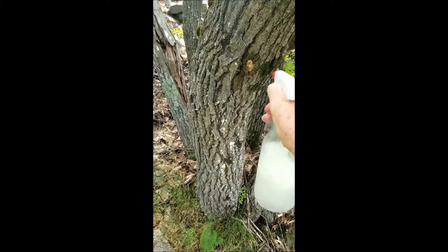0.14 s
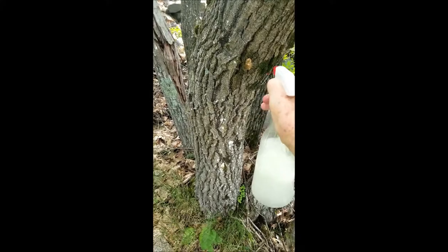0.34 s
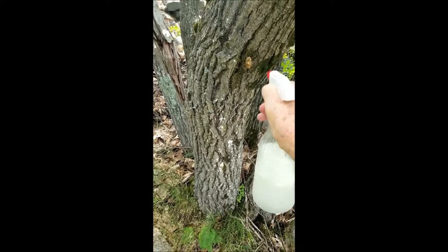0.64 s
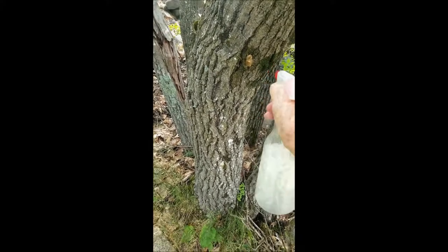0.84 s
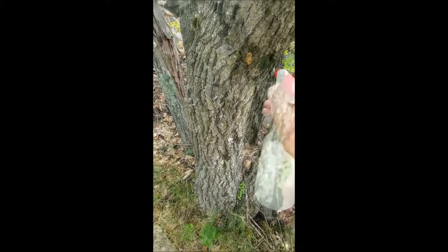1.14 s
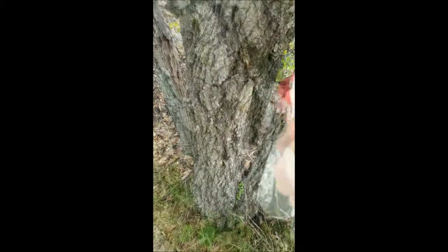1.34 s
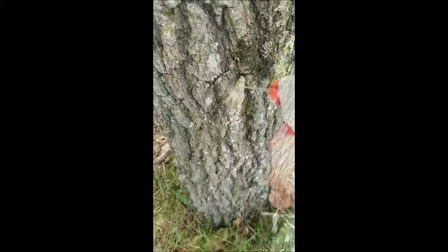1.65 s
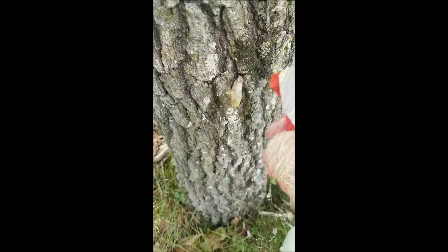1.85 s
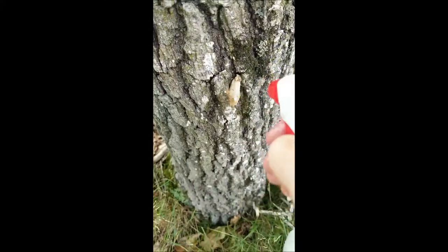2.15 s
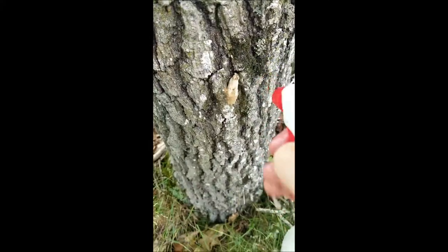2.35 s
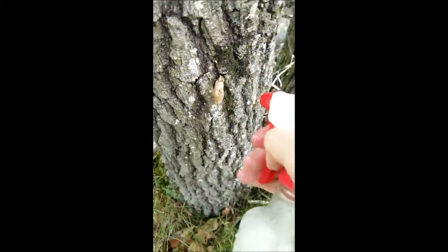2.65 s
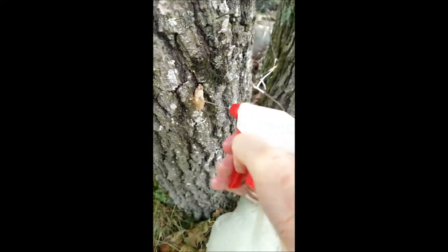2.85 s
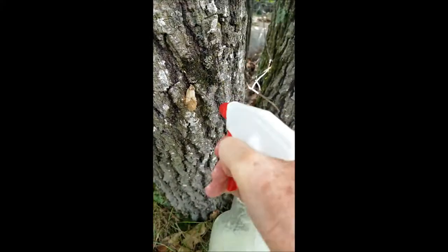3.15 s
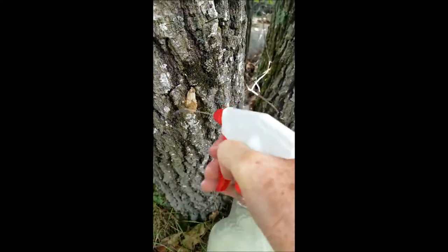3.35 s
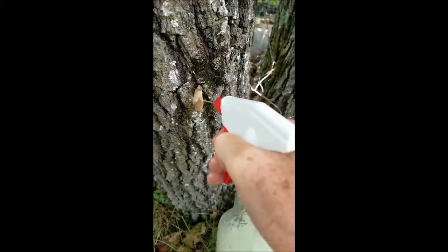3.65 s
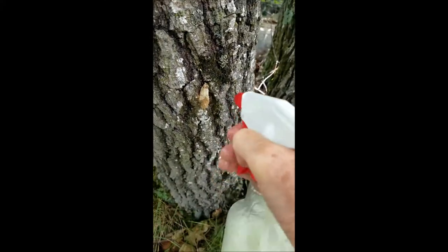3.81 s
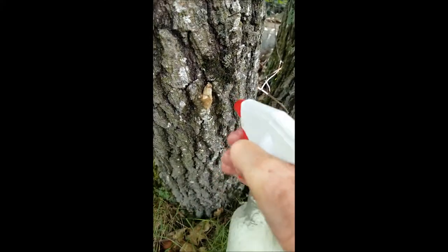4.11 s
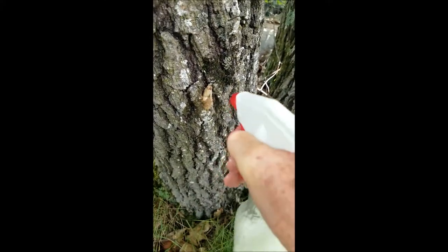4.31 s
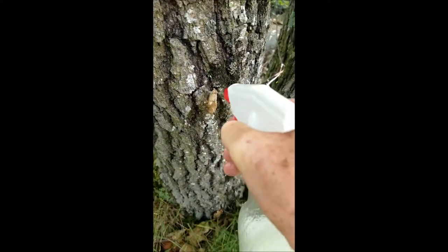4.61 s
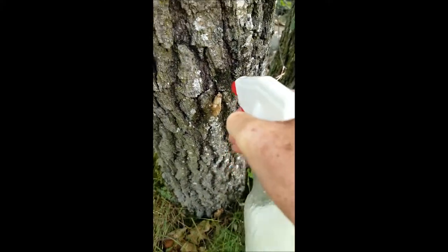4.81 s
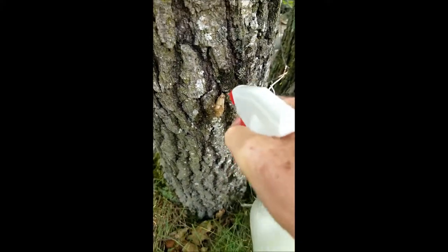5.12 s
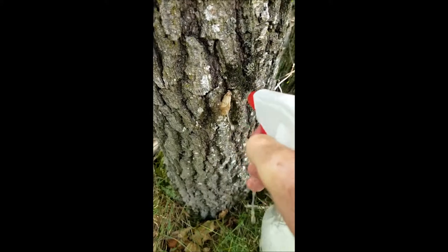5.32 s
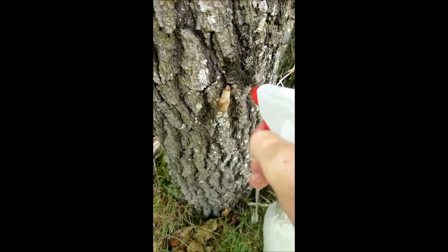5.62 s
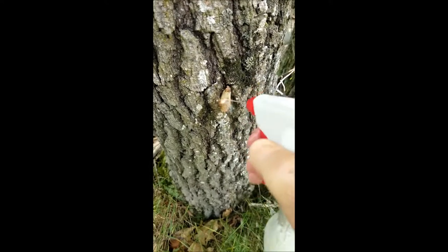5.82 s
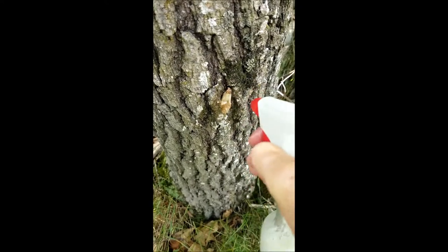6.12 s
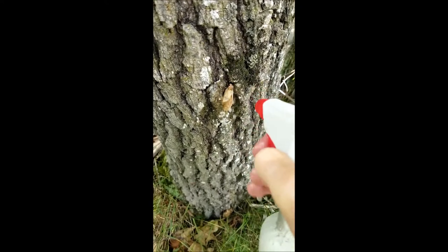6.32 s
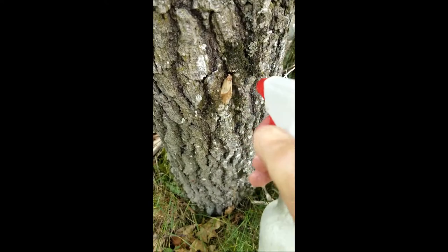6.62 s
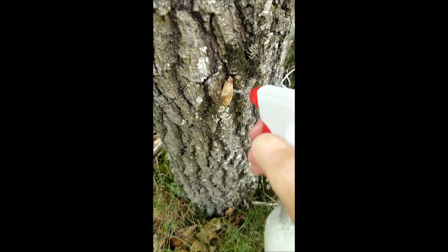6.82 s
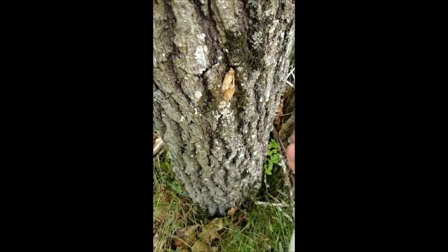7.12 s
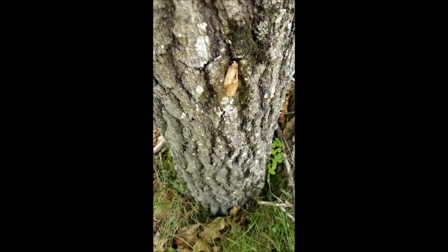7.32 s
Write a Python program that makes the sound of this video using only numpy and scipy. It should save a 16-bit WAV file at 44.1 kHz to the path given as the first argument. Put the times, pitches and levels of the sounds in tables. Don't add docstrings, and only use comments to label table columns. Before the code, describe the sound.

A plastic trigger sprayer is pumped about three times a second, very close to a stereo microphone. Each pull gives a brief bright hiss and wet splat on bark, with small clicks, dry valve snaps and hollow bottle knocks between. Low wind thumps buffet the microphone during the first second and a half, then a faint steady motor hum emerges under soft leaves and distant traffic.

```python
import sys
import numpy as np
from scipy import signal
from scipy.fft import rfft, irfft, next_fast_len
from scipy.io import wavfile

SR = 44100
rng = np.random.default_rng(int(sys.argv[2]) if len(sys.argv) > 2 else 0)


def store_wav(level_fs):
    pcm = np.round(np.clip(np.atleast_2d(level_fs), -1, 1) * 32767)
    wavfile.write(sys.argv[1], SR, pcm.T.astype(np.int16))


def volts(x):
    e = np.asarray(x, float) / 20
    return 10 ** e


N = 328986

# (valve opens [s], stays open [s], pressure peaks after [s], nozzle hiss [dB],
# thin splash over hiss [dB])
TRIGGER_PULLS = [(0.02, 0.066, 0.048, -55, 1), (0.474, 0.056, .01, -53.5, -3.5),
                 (0.759, 0.1, 0.046, -41, -8.5), (0.902, 0.044, 0.013, -61, -4),
                 (1.057, 0.11, 0.025, -41.5, -10), (1.349, 0.11, 0.04, -40, -4),
                 (1.627, 0.11, 0.042, -40, -2), (1.923, 0.12, 0.041, -43, -6.5),
                 (2.2, 0.15, 0.033, -44, -9), (2.517, 0.119, 0.045, -47, -8),
                 (2.821, 0.086, 0.067, -47.5, -8), (3.063, 0.1, 0.048, -54.5, -6),
                 (3.36, 0.11, 0.044, -56.5, -9), (3.628, 0.12, 0.024, -49, -8),
                 (3.956, 0.11, 0.048, -42, -7.5), (4.25, 0.1, 0.062, -41.5, -3),
                 (4.584, 0.15, 0.041, -45.5, -9.5), (4.885, 0.11, 0.048, -45, -9),
                 (5.205, 0.12, 0.04, -40.5, -14), (5.516, 0.11, 0.057, -47, -6),
                 (5.832, 0.11, 0.031, -42, -2.5), (6.174, .12, 0.05, -39, -2.5),
                 (6.502, 0.1, 0.033, -42.5, -16), (6.842, 0.098, 0.039, -38.5, -7.5)]
# (start [s], hold [s], splash [dB], coarse drops over splash [dB],
# hiss over usual [dB])
JET_SPURTS = [(0.784, 0.025, -49, -19, 7), (0.906, 0.031, -56.5, 4, -6), (1.077, 0.052, -54.5, -10, -4),
              (1.388, 0.026, -33.5, -18.5, 2.5), (1.635, 0.02, -37.5, -6, 3),
              (1.67, 0.018, -27.5, -19.5, -3), (1.704, 0.0035, -30, -31.5, -5),
              (2.209, 0.014, -30.5, -7.5, -2), (2.23, 0.028, -29.5, -13, 1.5),
              (2.262, 0.014, -34, -10.5, 6), (2.285, 0.012, -52, 4, 1), (2.548, .004, -43, -14, 7),
              (2.573, 0.022, -37, -3, 6.5), (2.843, 0.034, -47, -3, 5), (3.071, 0.0026, -32.5, -10.5, -1.5),
              (3.125, 0.014, -37.5, -7, 0), (3.356, 0.0035, -48, 0.5, 20), (3.439, 0.018, -57.5, 7.5, -1),
              (3.699, 0.011, -28, -15, 1), (4.016, 0.014, -43.5, 4, 3), (4.262, 0.015, -36, -3.5, 1),
              (4.29, 0.0093, -29, -12.5, 4.5), (4.959, 0.016, -50.5, -17, 11.5),
              (5.215, 0.011, -60, -16, 11), (5.24, 0.035, -43.5, -13, -1), (5.281, 0.012, -34, -18, 2),
              (5.523, 0.019, -27.5, -14.5, -0.5), (5.555, 0.017, -28, -16.5, -2),
              (5.563, 0.024, -33.5, -19, -2), (5.846, 0.011, -41.5, 2.5, 1), (5.87, .004, -28, -14, -2),
              (5.879, 0.012, -28, -16.5, -0.5), (5.908, 0.007, -42, -20, 5), (6.186, 0.013, -31, -9.5, -6),
              (6.216, 0.032, -37.5, -11, 3), (6.537, 0.024, -30, -16.5, 3), (6.858, 0.011, -47, 0, 1),
              (6.879, 0.016, -33, -13.5, 0), (6.905, .008, -35.5, -22.5, -1)]
# (frequency [Hz], level per Hz [dB])
SPRAY_COLOUR = [(410, -36), (700, -7), (888, -33.5), (1300, -21), (1860, -16), (2430, -12.5), (3330, 4),
                (4200, 3.5), (5510, 3.5), (6540, 4.5), (8190, -5.5), (11200, 0), (15000, 2.5),
                (15900, 11.5), (16500, -40)]
# (frequency [Hz], left over right [dB])
SPRAY_BALANCE = [(400, 12), (800, 15), (1700, 5.5), (2800, 7.5), (5800, 13), (6900, 11.5), (7900, 13),
                 (9000, -3), (11000, 11), (13000, 15), (15500, 6.5)]
# (time [s], peak [dB], ring [Hz])
LEVER_TICKS = [(0.7616, -34.5, 780), (1.476, -41.5, 1220), (1.5535, -40, 711), (1.7709, -40, 990),
               (2.057, -44.5, 1140), (2.145, -37.5, 1420), (3.5987, -49, 780), (5.047, -42, 1060),
               (5.122, -39, 645), (5.741, -38.5, 1090), (7.075, -40.5, 1660), (7.155, -36, 1290),
               (7.161, -31.5, 995)]
# (time [s], peak [dB], ring [Hz], scratch over peak [dB])
REFILL_TICKS = [(2.334, -46.5, 2000, 0.5), (2.424, -47, 2900, -7.5), (2.441, -54, 7060, -17),
                (2.458, -51, 2930, -25), (2.144, -46, 4500, -14), (1.005, -53, 4300, -14),
                (2.466, -39.5, 4640, -8), (2.475, -41.5, 1760, -22), (2.637, -37, 2120, -8),
                (2.6584, -39.5, 2400, -4), (2.721, -47, 2220, -28), (2.678, -44, 3000, -10),
                (2.7417, -38, 3120, -14), (2.743, -43, 6430, -18), (1.187, -48, 1900, -3),
                (2.379, -49, 1500, -4), (2.95, -45, 4200, -1.5), (2.991, -47, 4500, -9),
                (3.099, -47, 1750, -8), (3.221, -51, 3700, 5), (3.249, -33, 1880, -5.5),
                (3.319, -47, 3670, -16), (3.321, -42.5, 6100, -14), (3.363, -49, 2640, -12),
                (3.5109, -43.5, 2290, -8), (3.803, -44, 3600, -6), (3.8634, -46, 3440, -16),
                (4.0964, -52.5, 4040, 6.5), (4.3974, -47, 1920, -2), (4.737, -46, 5200, -3),
                (4.843, -46, 1700, -16.5), (5.036, -42, 6460, -12), (5.3474, -41, 4030, -11),
                (5.665, -46.5, 5090, -4), (5.9833, -39, 2260, -8), (6.0556, -36, 2160, -13),
                (6.259, -35, 6900, -28), (6.33, -45, 5500, -5), (5.668, -49, 2000, -14),
                (6.376, -43, 2500, -17), (6.6235, -42, 2160, -8), (6.937, -35, 3060, -12),
                (7.266, -52, 4200, -3), (7.274, -37, 6500, -15), (7.2823, -37.5, 3430, -12)]
# (time [s], peak [dB])
VALVE_SNAPS = [(0.9048, -28), (1.056, -23), (1.066, -34), (1.9227, -24), (2.5182, -33), (2.5421, -25),
               (2.8489, -36), (2.8644, -32), (3.32, -41), (3.361, -34), (3.5982, -29), (3.9838, -34),
               (4.5864, -24), (4.737, -36), (5.219, -22), (6.8447, -29), (7.281, -24)]
# (time [s], peak [dB], ring [Hz])
BOTTLE_KNOCKS = [(1.554, -40.5, 236), (1.706, -42, 252), (2.002, -45, 405), (2.729, -45.5, 264),
                 (3.132, -40.5, 255), (3.256, -44, 236), (3.599, -48.5, 332), (3.709, -42, 300),
                 (4.32, -40, 215), (4.841, -49, 252), (4.97, -38.5, 280.5), (5.289, -42, 247),
                 (5.744, -40.5, 261), (6.056, -39.5, 275), (6.415, -47, 290), (6.906, -35.5, 300),
                 (7.169, -46, 255)]
# (time [s], level [dB])
WIND_RUMBLE = [
    (0.0, -47.5),
    (0.338, -51),
    (0.608, -53),
    (0.834, -34),
    (0.964, -36.5),
    (1.306, -43.5),
    (1.56, -56),
]
# (time [s], left peak [dB], right peak [dB], pitch [Hz])
WIND_SWIRLS = [(0.031, -30.5, -46, 49), (0.105, -36, -38, 88), (0.186, -47, -41, 63), (0.209, -29, -33, 93),
               (0.251, -31, -64, 77), (0.628, -39, -35, 70.6), (0.696, -30.5, -33, 58.4),
               (0.768, -32, -48, 69), (0.8, -46, -25, 59.3), (0.827, -19.5, -21, 66),
               (0.855, -44, -25, 89.0), (0.885, -33, -25, 90.5), (0.923, -40, -28, 90),
               (0.99, -24.5, -45, 67.6), (1.07, -35, -25, 71.5), (1.113, -20.5, -22.5, 90),
               (1.146, -29, -26.5, 58.4), (1.186, -54, -38, 114), (1.249, -21, -17, 81.6),
               (1.351, -29, -57, 86), (1.379, -38, -59, 74), (1.44, -32.5, -49, 71),
               (1.464, -44, -27.5, 58), (2.124, -52, -37, 88), (2.16, -51, -40, 97)]
# (time [s], peak [dB], pitch [Hz], left over right [dB])
WIND_FLAPS = [(0.046, -40, 237, -4), (0.754, -35, 146, 7), (0.819, -32, 175, 23), (0.879, -27, 143, 4),
              (0.909, -47, 198, -7), (0.987, -34, 205, -6), (1.04, -28, 193, 5), (1.071, -17.5, 209, 1),
              (1.262, -33, 170, -18), (1.342, -52, 159, -6), (1.44, -38, 216, 3)]
# (time [s], level of the second harmonic [dB])
HUM_SWELL = [(1.5, -49.5), (1.9, -47.5), (2.01, -50.5), (2.35, -44), (3.36, -46.5), (3.47, -49.5),
             (3.96, -48), (4.21, -55), (4.64, -47), (4.97, -44), (5.37, -46), (6.07, -39), (6.33, -37.5),
             (6.71, -46.5), (7.08, -40), (7.46, -43)]
# (multiple of its turning rate [x], level [dB])
MOTOR_HARMONICS = [
    (1, -20.5),
    (2, 1),
    (3, -22),
    (4, -28),
    (5, -25),
    (6.33, -35),
    (7, -31),
]
# (time [s], level over average [dB])
BREEZE_STRENGTH = [(0.0, 4), (0.12, 0.5), (0.72, -0.5), (0.93, 3.5), (1.24, 3), (2.93, -4), (3.2, -0.5),
                   (3.76, -2), (6.05, 4.5), (6.4, 4), (6.65, 2.5), (7.46, 2)]
# (frequency [Hz], level per Hz [dB])
OUTDOOR_COLOUR = [(19, -51), (30, -18.5), (62, -4.5), (95, -8), (146, -10.5), (180, -14), (298, -17.5),
                  (420, -19), (928, -29.5), (2500, -28), (5900, -25.5), (8530, -32.5), (12500, -22.5),
                  (15800, -22)]
# (frequency [Hz], likeness 0 to 1 [-])
OUTDOOR_LIKENESS = [
    (60, 0.76),
    (290, 0.69),
    (640, 0.33),
    (1400, 0),
]
# (frequency [Hz], left over right [dB])
OUTDOOR_BALANCE = [
    (60, -5),
    (400, 4.5),
    (4400, 2.5),
    (8100, -1.5),
    (15000, 2),
]

PORT_LAG = 9
PADDED = next_fast_len(N, True)
HZ = np.maximum(np.fft.rfftfreq(PADDED, 1 / SR), 1)
SECONDS = np.arange(N) / SR


def spray():
    hiss_db, thin_db = np.array(TRIGGER_PULLS)[:, 3:].T
    stream_db = hiss_db + thin_db
    splash_db, coarse_db, extra_hiss_db = np.array(JET_SPURTS)[:, 2:].T
    coarseness_db = coarse_db + 15.0
    jet_hiss_db = splash_db + extra_hiss_db - 7.5 - 0.42 * coarseness_db
    wet = spray_noise(0.44, drops_per_s=19000, spread_db=0.5)
    mist = spray_noise(0.6, drops_per_s=14000, spread_db=3.0)

    coarse = flow_level(stream_db - 5.5, splash_db + coarse_db, 0.46)
    coarse = coarse * patchy(wet, 950, 3050, count=4, patch_db=2.5)
    dull = flow_level(stream_db - 2.0, splash_db - 6.0 + 0.34 * coarseness_db, 0.77)
    dull = dull * patchy(wet, 2670, 5960, count=5, patch_db=2.0)
    bright = flow_level(stream_db - 7.5, splash_db - 6.5 - 0.7 * coarseness_db, 0.81)
    bright = bright * patchy(wet, 5450, 9660, count=4, patch_db=3.0)
    hiss = flow_level(hiss_db, jet_hiss_db, 0.6)
    hiss = hiss * patchy(mist, 6460, 19600, count=6, patch_db=2.5)

    sputter_db = 0.5 * drift(60) + 0.6 * drift(280)
    return volts(sputter_db) * (coarse + dull + bright + hiss)


def spray_noise(alike, drops_per_s, spread_db):
    sizes = volts(spread_db * np.minimum(rng.exponential(1, (2, N)), 4))
    sizes = sizes * rng.choice([-1, 1], (2, N))
    near, scattered = sizes * (rng.random((2, N)) < drops_per_s / SR)
    near = near + volts(-5) * near.std() * ringing_drops(2000)
    far = alike * np.roll(near, PORT_LAG) + np.sqrt(1 - alike ** 2) * scattered
    coloured = rfft([near, far], PADDED) * volts(at_hz(SPRAY_COLOUR)) * sides(at_hz(SPRAY_BALANCE))
    return irfft(coloured, PADDED)[:, :N]


def flow_level(stream_db, spurt_db, swell_share):
    stream, valve = stream_level(stream_db)
    flow = valve * np.hypot(stream, jet_level(spurt_db, swell_share))
    lag = np.exp(-1 / (0.0013 * SR))
    return signal.lfilter([1 - lag], [1, -lag], np.roll(flow, -40))


def stream_level(db):
    rise_s, sag_s, shut_s = 0.053, 0.051, 0.015
    out, valve = np.zeros((2, N))
    for (opens, length, peak, *_), top_db in zip(TRIGGER_PULLS, db):
        t = np.arange(round(length * SR)) / SR
        span = slice(round(opens * SR), round(opens * SR) + len(t))
        from_peak = (t - peak) / np.where(t < peak, rise_s, sag_s)
        out[span] = volts(top_db - 10 * from_peak ** 2)
        valve[span] = np.minimum((length - t) / shut_s, 1) ** 2
    return out, valve


def jet_level(db, swell_share):
    build_db_per_s, collapse_db_per_s, usual_hold_s = 1300, 1004, 0.025
    power, t = np.zeros(N), np.arange(-2000, 5000) / SR
    for (s, hold, *_), top_db in zip(JET_SPURTS, db):
        under_db = build_db_per_s * np.maximum(-t, 0) + collapse_db_per_s * np.maximum(t - hold, 0)
        under_db = under_db * np.sqrt(usual_hold_s / hold)
        power[round(s * SR) - 2000:][:len(t)] += volts(2 * (top_db - swell_share * under_db))
    return np.sqrt(power)


def patchy(x, low_hz, high_hz, count, patch_db):
    edges = np.geomspace(low_hz, high_hz, count + 1)
    total = 0
    for k in range(count):
        band = (-1) ** k * pass_band(x, edges[k], edges[k + 1])
        total = total + volts(patch_db * drift(37)) * band
    return mid_one(total)


def bottle():
    out = np.zeros((2, N))
    for s, db, hz in LEVER_TICKS:
        add(out, s, tick(db, hz, scratch_db=-2), pan_db=8.5)
    for s, db, hz, scratch_db in REFILL_TICKS:
        add(out, s, tick(db, hz, scratch_db), pan_db=16.5)
    for s, db in VALVE_SNAPS:
        add(out, s, snap(db), pan_db=11.0)
    for s, db, hz in BOTTLE_KNOCKS:
        add(out, s, knock(db, hz), pan_db=0.5)
    return out


def tick(db, hz, scratch_db):
    size = 1500
    t = np.arange(size) / SR
    slips = rng.standard_normal(size) * (rng.random(size) < 600 / SR)
    slips = slips * volts(np.minimum(scratch_db + 6, 0) - 60 * t / 0.045)
    slips[0] = 0.9
    clean = np.clip(-scratch_db / 15 - 0.7, 0, 1)
    overtones = 0.5 * ring(1.7 * hz, 0.006, size) + 0.3 * ring(0.62 * hz, 0.008, size)
    part = ring(hz, 10 / hz + 0.006 + clean * 0.016, size) * (1 - clean * np.exp(-t / 0.001))
    part = part + (1 - clean) * overtones
    rings = signal.fftconvolve(slips, part)[:size]
    scratch = pass_band(rng.standard_normal(size), 1380, 4700)
    scratch = scratch * volts(-60 * t / 0.028) * (1 - np.exp(-t / 0.00077))
    return volts(db) * (0.51 * rings / np.abs(rings).max() + volts(scratch_db + 3.5) * scratch)


def snap(db):
    burst = np.diff(rng.standard_normal(301))
    return volts(db - 9.5) * burst * volts(-60 * np.arange(300) / SR / 0.00088)


def knock(db, hz):
    body = np.zeros(4000)
    for multiple, gain, t60 in [(1, 0.24, 0.1), (1.6, 0.41, 0.021), (2.3, 0.24, 0.016), (3.4, 0.24, 0.006)]:
        body += gain * ring(multiple * hz, t60, 4000)
    return volts(db + 5.5) * signal.lfilter([0.2], [1, -0.8], body)


def wind():
    s, db = np.transpose(WIND_RUMBLE)
    lumps = volts(1.9 * np.array([drift(9.3), drift(5.1)]))
    rumble = mid_one(lumps * pass_band(rng.standard_normal((2, N)), 49, 80, order=1))
    level = volts(np.interp(SECONDS, s, db - 4.0, right=-150))
    out = level * pass_band(rumble, 12, 235) * 1.5
    for s, left_db, right_db, hz in WIND_SWIRLS:
        at = round(s * SR)
        out[:, at - 900:at + 2000] += volts(np.array([[left_db], [right_db]]) - 1.5) * eddy(hz, turns=1.0)
    for s, db, hz, pan_db in WIND_FLAPS:
        at = round(s * SR)
        out[:, at - 700:at + 2200] += volts(db - 2.5) * sides(pan_db)[:, None] * eddy(hz, turns=0.9)
    return out


def eddy(hz, turns):
    t = np.arange(-900, 2000) / SR
    phase = rng.uniform(0, 2 * np.pi) + rng.normal(0, 1.0, (2, 1))
    bend = rng.normal(-0.15, 0.2)
    swing = 2 * np.pi * hz * t * (1 + bend * np.tanh(hz * t)) + phase
    wave = np.sin(swing) + 0.28 * np.sin(2 * swing) + 0.052 * np.sin(3 * swing)
    return wave * np.exp(-(t * hz / turns) ** 2)


def hum():
    motor_hz, early_db = 59.08, -61.5
    s, db = np.transpose([(0, early_db), (1.4, early_db)] + list(HUM_SWELL))
    turns = 2 * np.pi * np.cumsum(motor_hz * (1 + 0.0013 * drift(1.62))) / SR
    tones = np.zeros(N)
    for k, level_db in MOTOR_HARMONICS:
        waver_db = 0.7 if k == 2 else 3.0
        tones += volts(level_db + waver_db * drift(1.9)) * np.sin(k * turns + k * k)
    return np.sqrt(2) * volts(np.interp(SECONDS, s, db)) * tones * sides(3.1)[:, None]


def air():
    breeze_db = np.interp(SECONDS, *np.transpose(BREEZE_STRENGTH))
    lull_db = -8 * np.exp(-((SECONDS - 3.1) / 1) ** 2)
    both = air_spectrum()
    above = 1 / (1 + (1300 / HZ) ** 4)
    top = 1 / (1 + (7500 / HZ) ** 8)
    traffic = irfft(both * np.sqrt(1 - above), PADDED)[:, :N]
    leaves = irfft(both * np.sqrt(above - top), PADDED)[:, :N]
    hiss = irfft(both * np.sqrt(top), PADDED)[:, :N]
    traffic = traffic / pass_band(traffic.mean(axis=0), 300, 1200).std()
    leaves_db = -63 + 0.82 * breeze_db

    steady = volts(-64.5 + 0.85 * breeze_db + 0.9 * drift(4.0)) * traffic
    steady = steady + volts(leaves_db + 0.9 * drift(9.0)) * mid_one(leaves)
    steady = steady + volts(-64.5 + 0.16 * breeze_db + lull_db + 0.9 * drift(6.0)) * mid_one(hiss)
    patter = pass_band([ringing_drops(500), ringing_drops(500)], 900, 7000)
    steady = steady + volts(leaves_db - 7.5) * patter

    patches = volts(1.6 * drift(28.0)) - 1
    low_rustle = patches * pass_band(steady, 800, 2150)
    high_rustle = np.roll(patches, N // 2) * pass_band(steady, 1480, 3000)
    return steady + low_rustle + high_rustle


def air_spectrum():
    mid, side = rfft(rng.standard_normal((2, N)), PADDED)
    alike = np.clip(at_hz(OUTDOOR_LIKENESS), 0, 1)
    both = np.sqrt(1 + alike) * mid + np.sqrt(1 - alike) * side * [[1], [-1]]
    return both * volts(at_hz(OUTDOOR_COLOUR)) * sides(at_hz(OUTDOOR_BALANCE))


def ringing_drops(per_s):
    pitches = np.geomspace(1100, 15000, 22)
    sizes = rng.standard_normal(N) * (rng.random(N) < per_s / SR) + 1e-18
    dealt = rng.integers(0, len(pitches), N)
    out = np.zeros(N)
    for k, hz in enumerate(pitches):
        r = volts(-60 * hz / 45 / SR)
        w = 2 * np.pi * hz / SR
        out += hz * signal.lfilter([np.sin(w)], [1, -2 * r * np.cos(w), r * r], sizes * (dealt == k))
    return out / out.std()


def ring(hz, t60, size):
    t = np.arange(size) / SR
    return np.sin(2 * np.pi * hz * t) * volts(-60 * t / t60)


def drift(rate):
    r = np.exp(-2 * np.pi * rate / SR)
    slow = signal.lfilter([1], [1, -2 * r, r * r], rng.standard_normal(N + SR))[SR:]
    return (slow - slow.mean()) / slow.std()


def add(out, s, sound, pan_db):
    for side, gain, lag in zip(out, sides(pan_db), (0, PORT_LAG)):
        at = round(s * SR) + lag
        side[at:at + len(sound)] += gain * sound[:N - at]


def sides(pan_db):
    return volts(np.multiply.outer([0.5, -0.5], pan_db))


def pass_band(x, low_hz, high_hz, order=2):
    return signal.sosfilt(signal.butter(order, [low_hz, high_hz], "band", fs=SR, output="sos"), x)


def mid_one(x):
    return x / np.sqrt(np.mean(x.mean(axis=0) ** 2))


def at_hz(points):
    hz, value = np.transpose(points)
    return np.interp(np.log(HZ), np.log(hz), value)


def scene():
    return spray() + bottle() + wind() + hum() + air()


def roll_off(x):
    return signal.sosfilt(signal.butter(12, 17010, fs=SR, output="sos"), x)


def record(dry):
    low_pass = signal.cheby2(16, 58, 16150, fs=SR, output="sos")
    mix = signal.sosfilt(low_pass, dry)
    return roll_off(mix)


dry = scene()
out = record(dry)
store_wav(out)
```